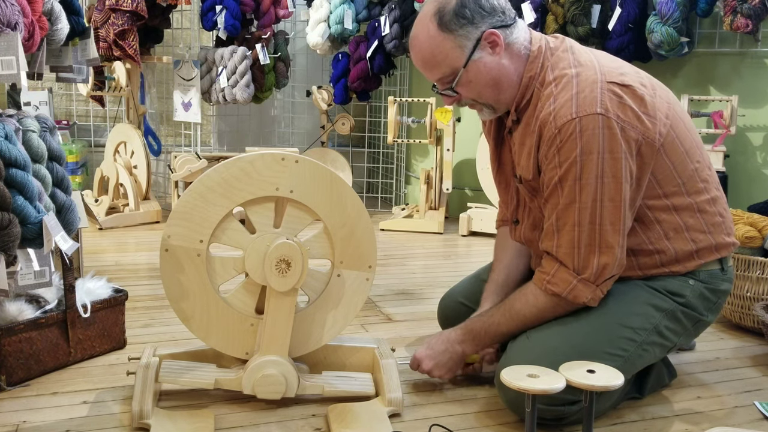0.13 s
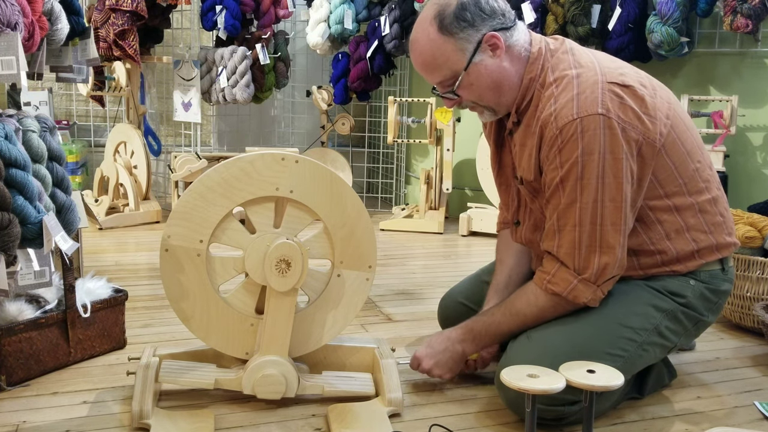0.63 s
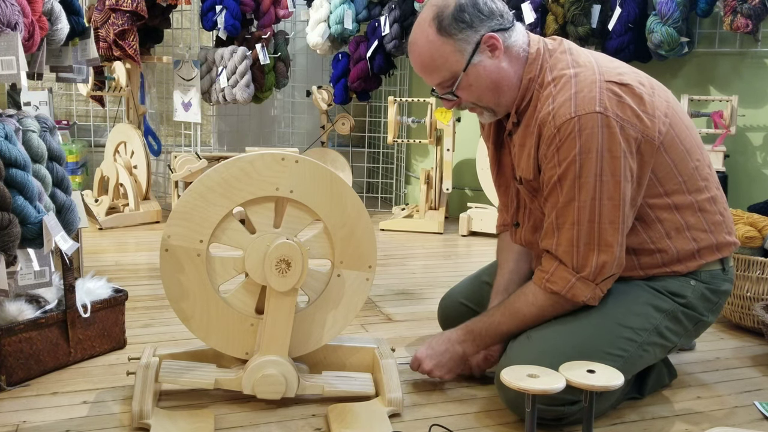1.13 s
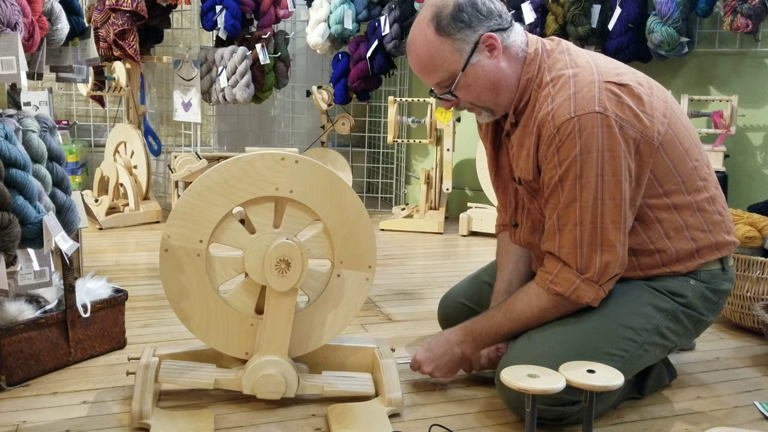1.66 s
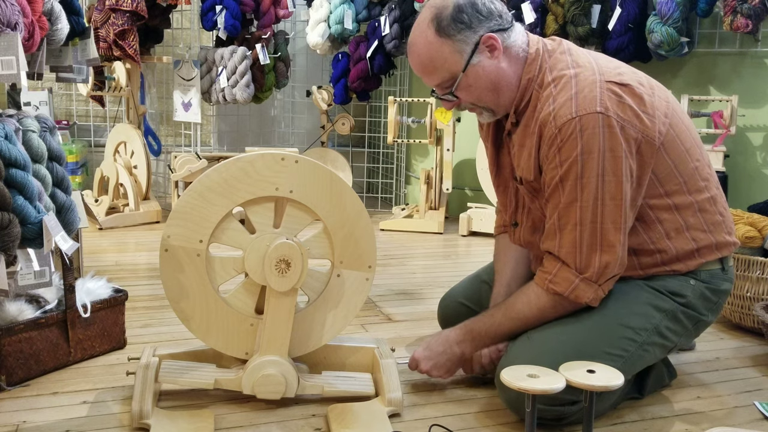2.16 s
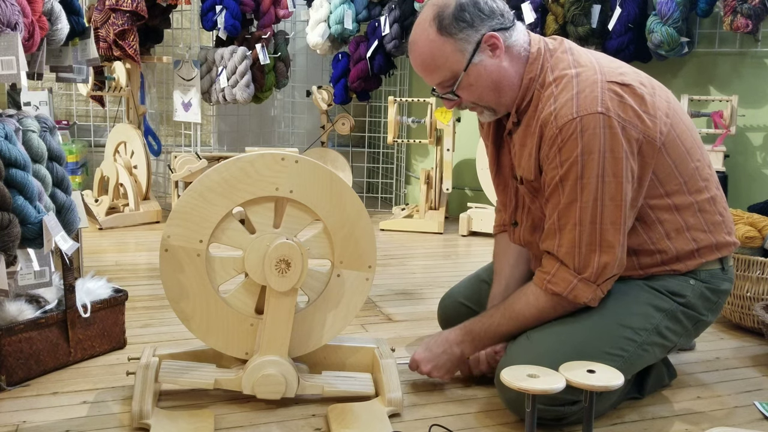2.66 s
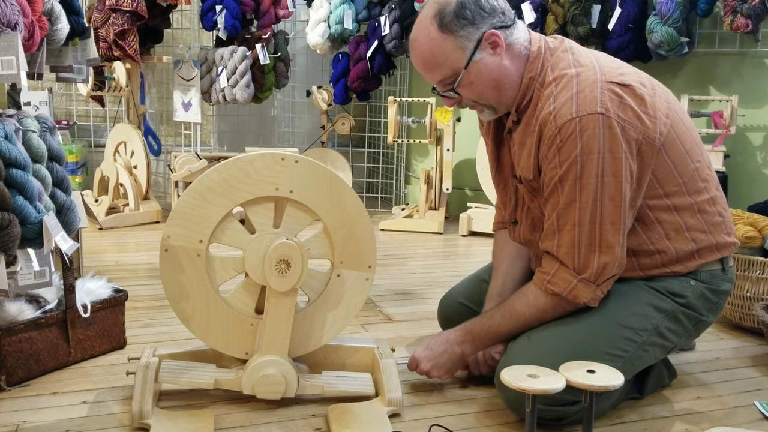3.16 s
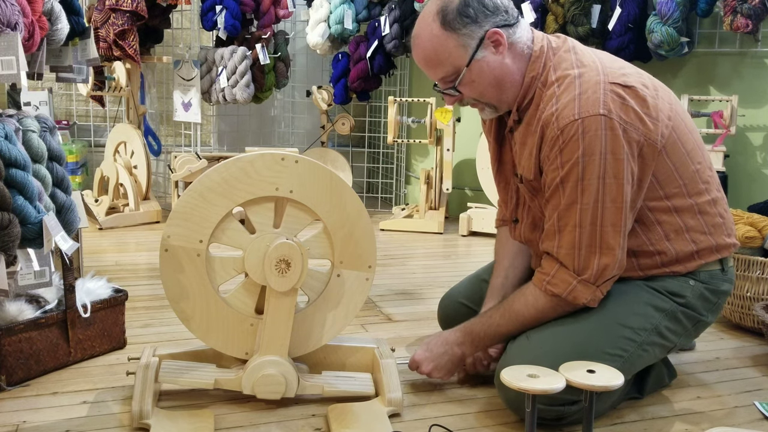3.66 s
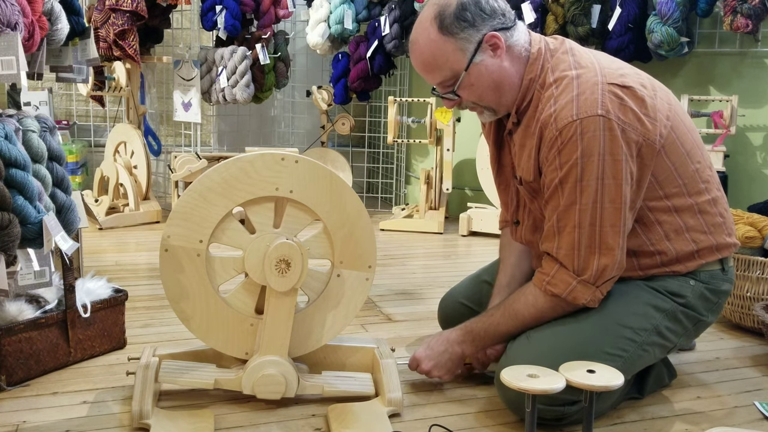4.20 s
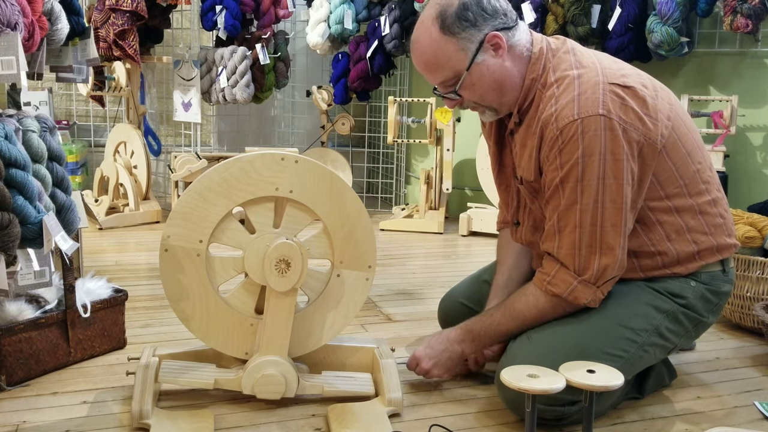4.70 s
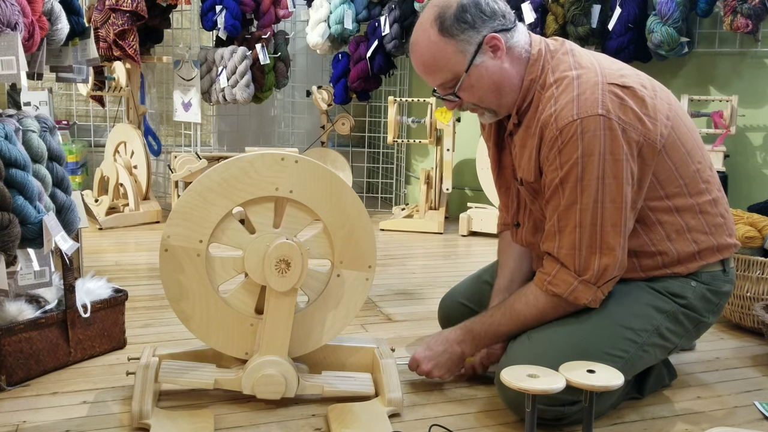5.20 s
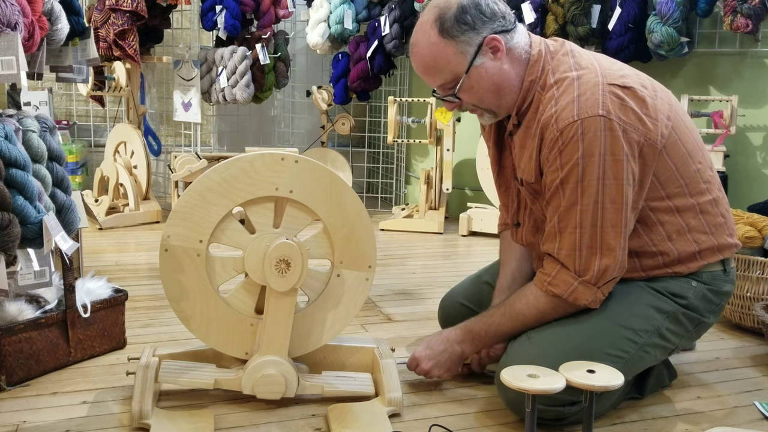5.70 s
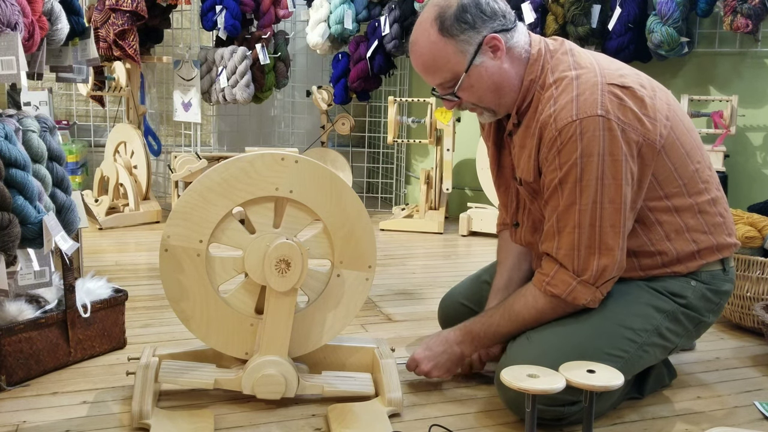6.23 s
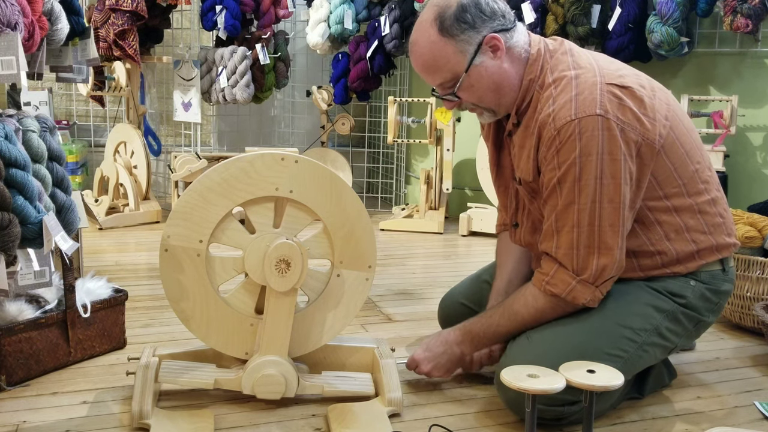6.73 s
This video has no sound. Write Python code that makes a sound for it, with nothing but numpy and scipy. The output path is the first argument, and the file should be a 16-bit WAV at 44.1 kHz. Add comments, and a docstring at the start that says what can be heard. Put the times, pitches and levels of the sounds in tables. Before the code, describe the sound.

A hand screwdriver slips and knocks irregularly on a wooden frame over a plank floor, above low street rumble that grows as vehicles pass.

```python
"""A shop with a plank floor: a hand screwdriver turns screws into a wooden frame. Its tip slips and knocks or
scrapes, the frame bumps the floor and the screw head pings; struck parts ring in modes. Shifting weight drums
the floor, a decaying low tone. Street rumble, shaped noise, makes the shop boom on two low notes, later with a
weaker upper one: narrow-band noise, drawn as wavering sines whose levels rise and fall. Two vehicles pass as
roar and tyre noise. The left microphone port hisses in the upper middle range."""
import sys
import numpy as np
from scipy import signal
from scipy.fft import rfft, irfft, next_fast_len
from scipy.io import wavfile
from scipy.ndimage import uniform_filter1d

SR = 44100
rng = np.random.default_rng(int(sys.argv[2]) if len(sys.argv) > 2 else 0)


def ratio_of_db(decibels):
    """Turn decibels (scalar or array-like) into linear amplitude factors; 0 dB maps to 1."""
    return 10 ** (np.asarray(decibels, float) / 20)


def transcribe(u):
    """Save the signal u as a 16-bit wav file named by the first command-line argument.

    u: samples, shape (n,) or (channels, n), limited to [-1, 1]; the rate is SR.
    q: integer samples, one column per channel.
    """
    v = np.clip(np.atleast_2d(u).T, -1, 1)
    q = np.round(v * 32767).astype(np.int16)
    wavfile.write(sys.argv[1], SR, q)


N = 302069  # length in samples


def read(points, hz):
    """Reads a table of (f/Hz, value) over log frequency."""
    f, value = np.transpose(points)
    return np.interp(np.log(hz + 1), np.log(f + 1), value)


def curve(rows):
    """Reads a table of (t/s, value) for every sample."""
    t, value = np.transpose(rows)
    return np.interp(np.arange(N) / SR, t, value)


def noise(colour, patchy_db, lean, likeness, notes=()):
    """Two-port noise of mid rms 1 with drifting patches and a slow swell; notes are narrow resonances."""
    hz = np.fft.rfftfreq(2048, 1 / SR)
    a, b, c, d, patches = rng.standard_normal((N // 512 + 5, len(hz), 5)).T
    swell = uniform_filter1d(patches[0], size=8)
    patches = uniform_filter1d(patches, size=12, axis=0)  # over frequency
    patches = uniform_filter1d(patches, size=6, axis=1)  # over time
    drift = patches / patches.std() + 0.53 * swell / swell.std()
    shape_db = read(colour, hz)
    for f, width, db in notes:
        shape_db = shape_db + db / (1 + (2 * (hz - f) / width) ** 2)
    same = np.clip(read(likeness, hz), -1, 1)[:, None]
    left = a + 1j * b
    right = same * left + np.sqrt(1 - same ** 2) * (c + 1j * d)
    z = np.array([left, right]) * ratio_of_db(shape_db[:, None] + patchy_db * drift)
    z[1] /= ratio_of_db(read(lean, hz))[:, None]
    x = signal.istft(z, nperseg=2048, noverlap=1536)[1][:, :N]
    return x / x.mean(0).std()


# how alike street noise is at both ports: f/Hz, likeness
STREET_LIKENESS = [(60, 0.96), (200, 0.87), (400, 0.75), (700, 0.16), (1200, 0.59), (2500, 0.16),
                   (5000, 0.095)]
# notes at which the shop resonates: f/Hz, width/Hz, level/dB
SHOP_NOTES = [(182.5, 23.7, 13.5), (241.7, 5, -1), (280, 20, 6.5), (364, 35, 11), (474, 22, 7),
              (589, 55, 5.5), (1150, 150, -1)]


def street_noise(colour, patchy_db, notes=SHOP_NOTES):
    """Noise from outside, stronger at the left port, that can excite the notes of the shop."""
    lean = [(100, 0.6), (5000, 1.9)]  # left minus right: f/Hz, level/dB
    return noise(colour, patchy_db, lean, STREET_LIKENESS, notes)


# strength of the street rumble: t/s, level/dB
RUMBLE_LEVEL = [(0, -57.5), (0.65, -62), (1.1, -71.5), (1.45, -73), (1.62, -61), (2.12, -59), (2.58, -61.5),
                (3.15, -56.5), (3.85, -58.5), (4.6, -53.5), (5.11, -55.5), (5.55, -53.5), (6.85, -51.5)]
# its balance of low and high: f/Hz, level/dB
RUMBLE_COLOUR = [(25, -21), (55, 5.5), (110, -2.5), (140, -12.5), (200, -11.5), (260, -13), (400, -36),
                 (700, -54.5)]


def street_rumble():
    """Low noise from the street that rises and falls all along."""
    return ratio_of_db(curve(RUMBLE_LEVEL)) * street_noise(RUMBLE_COLOUR, 1.5)


# pitches of the lower, higher and weaker upper note, one list each, before they waver: t/s, f/Hz
BOOM_PITCHES = [
    [(0, 78.67), (1, 73.5), (2, 77), (3.3, 75.76), (4.6, 79.43), (6.3, 78.53), (6.85, 76.5)],
    [(0, 84.6), (.3, 87.5), (1.2, 86.93), (1.5, 92.16), (2.8, 90.5), (4.3, 93.6), (5.6, 92), (6.5, 93.18),
     (6.85, 90.17)],
    [(4.4, 119), (5.2, 119.2), (6.85, 117.8)],
]
# the course of levels for each note: t/s, level/dB
LOW_BOOM = [(0.0, -50), (0.44, -75), (0.48, -57.5), (1.08, -54.5), (1.24, -79), (1.62, -55), (2.78, -69.5),
            (3.49, -49), (3.83, -60.5), (4.02, -48), (4.58, -52.5), (4.64, -77), (4.69, -48), (4.92, -48),
            (5.04, -60.5), (5.32, -44), (5.74, -70), (6.28, -35), (6.81, -40), (6.85, -38)]
HIGH_BOOM = [(0.0, -52.5), (0.21, -43), (0.36, -69), (0.44, -51.5), (1.22, -60), (1.77, -43), (1.89, -52),
             (2.15, -45), (2.65, -64), (2.76, -47), (2.96, -55.5), (3.09, -42.5), (3.89, -56.5),
             (4.14, -43.5), (4.37, -64), (4.46, -50), (5.04, -50.5), (5.17, -64), (6.09, -40.5),
             (6.28, -56), (6.49, -38), (6.7, -43), (6.79, -32.5), (6.85, -40.5)]
UPPER_BOOM = [(4.2, -80), (4.6, -58), (5.0, -53), (5.3, -56.5), (5.6, -70), (6.2, -59.5), (6.6, -56),
              (6.85, -50)]


def boom():
    """Narrow-band low room noise, drawn as wavering sines whose levels rise and fall along set courses."""
    waver_hz = 0.58
    out = np.zeros(N)
    for pitch, level in zip(BOOM_PITCHES, (LOW_BOOM, HIGH_BOOM, UPPER_BOOM)):
        # about eight random pitch targets a second
        waver = np.interp(np.arange(N), np.linspace(0, N, 56), rng.standard_normal(56))
        turns = np.cumsum(curve(pitch) + waver_hz * waver) / SR + rng.random()
        out += np.sqrt(2) * ratio_of_db(curve(level)) * np.sin(2 * np.pi * turns)
    return out


# quiet shop and microphone: f/Hz, level/dB per Hz
QUIET_COLOUR = [(20, -25.5), (35, -14), (50, -4.5), (70, 3.5), (110, -9.5), (140, -10), (185, -13),
                (260, -25), (500, -28.5), (1200, -34.5), (2000, -41), (3500, -41), (6000, -48), (7600, -57),
                (8600, -56.5), (9800, -49.5), (12000, -40), (16000, -37.5)]
# extra hiss of the left port: f/Hz, level/dB per Hz
LEFT_HISS_COLOUR = [(1000, -36.5), (1500, -8.5), (1950, 3.5), (2500, -1.5), (3000, -10.5), (3600, -22),
                    (4300, -18), (5000, -15), (6500, -17), (7300, -30), (8500, -62)]
# how alike the hiss is at both ports: f/Hz, likeness
HISS_LIKENESS = [(60, 0.74), (150, 0.71), (380, 0.43), (950, -0.055), (2380, -0.51), (5980, 0.082),
                 (15000, -0.1)]
# hiss, left minus right: f/Hz, level/dB
HISS_LEAN = [(60, 2.9), (210, 4.7), (500, 0.44), (15000, 1.2)]


def quiet_and_hiss():
    """Shaped noise of the quiet shop and microphone, plus more hiss at the left port."""
    quiet_db, left_hiss_db = -59.5, -67.5
    out = ratio_of_db(quiet_db) * noise(QUIET_COLOUR, 2.2, HISS_LEAN, HISS_LIKENESS)
    out[0] += ratio_of_db(left_hiss_db) * noise(LEFT_HISS_COLOUR, .8, HISS_LEAN, HISS_LIKENESS)[0]
    return out


FRAME_PART, PLANK_PART, SHANK_PART, TIP_PART, SCREW_PART = range(5)
# modes of each part, before each contact varies them: f/Hz, level/dB, t60/s (time to fall 60 dB)
FRAME = [(599, -13, 0.069), (805, -15.5, 0.02), (904, -8, 0.028), (1142, -1, 0.054), (1232, -0.5, 0.017),
         (1410, -0.5, 0.034)]
PLANKS = [(245, -21.5, 0.02), (271.4, 9.5, 0.074), (335, 2, 0.07), (384, 1.5, 0.12), (480, 3.5, 0.095)]
SHANK = [(1742, 1, 0.025), (1925, 3.5, 0.027), (2040, 0, 0.0039), (2383, -4, 0.02), (2750, -9.5, 0.018)]
TIP = [(3270, 2, 0.0082), (3840, -1, 0.016), (4220, 2, 0.017), (4650, -5, 0.0087), (5300, -8, 0.0097),
       (6800, -20, 0.0039), (7700, -10, 0.011), (12600, -30.5, .004)]
SCREW = [(1735, -3, .04), (2545, 0, .045), (4520, -3, .022), (6300, -16, .01)]  # screw and blade in touch


def ring_of(part, plank_hz, frame_hz):
    """Decaying sines of one part; planks and frame favour modes near the given note."""
    t = np.arange(4000) / SR
    modes = (FRAME, PLANKS, SHANK, TIP, SCREW)[part]
    hz, mode_db, t60 = np.transpose(modes)[:, :, None]
    spot = rng.standard_normal((len(modes), 2))  # each contact lands a little differently
    if part == PLANK_PART:
        mode_db = mode_db - 32.5 * abs(np.log2(hz / plank_hz))  # dB per octave
    if part == FRAME_PART:
        mode_db = mode_db - 19 * abs(np.log2(hz / frame_hz))
    envelope = ratio_of_db(mode_db + 2.74 * spot[:, :1] - 60 * t / t60)
    return (envelope * np.sin(2 * np.pi * hz * (1 + 0.0051 * spot[:, 1:]) * t)).sum(0)


# echoes that drive frame, planks, shank, tip, screw, in this order: level/dB, t60/s
PART_ECHOES = [(5.5, 0.26), (-11.5, 0.73), (5.5, 0.35), (-1.5, 0.47), (4.5, 0.42)]


def contact(parts, chatter_ms, blow, plank_hz=None, frame_hz=None, press_ms=0):
    """A blow and its chatter, then scattered shop echoes, through the modes of the parts (index, dB)."""
    near_walls_ms, late_db = 59, -4  # the near walls answer first, then the echoes are weaker
    out, t = 0, np.arange(12000) / SR
    grit = rng.standard_normal((3, len(t)))
    chatter = grit[0] * abs(grit[0]) / (1 + (t * 1000 / chatter_ms) ** 6)
    chatter *= np.exp(-t * 1000 / (1.26 * chatter_ms))
    chatter[:3] += blow
    scatter = .6 * grit[0] + grit[1:]  # the ports share part of the echoes
    scatter *= ratio_of_db(late_db / (1 + (near_walls_ms / (1000 * t + 1)) ** 12))
    press = np.hanning(3 + round(press_ms * SR / 1000))  # a longer press is softer
    for part, db in parts:
        echo_db, echo_t60 = PART_ECHOES[part]
        ring = ring_of(part, plank_hz, frame_hz)
        echoes = scatter * ratio_of_db(echo_db - 60 * t / echo_t60) * np.minimum(t / 0.0028, 1)
        drive = signal.lfilter(press, 1, chatter + echoes)
        sound = signal.fftconvolve(drive, ring[None], axes=1)
        loudest = np.sqrt(uniform_filter1d(sound.mean(0) ** 2, size=500).max())  # rms over 11 ms
        out = out + ratio_of_db(db) * sound / loudest
    return out


def wood_and_steel(frame_db, plank_db, steel_db):
    """Levels for a slip of the tip: the tip rings 8 dB weaker than the shank."""
    return [(FRAME_PART, frame_db), (PLANK_PART, plank_db), (SHANK_PART, steel_db), (TIP_PART, steel_db - 8)]


def add(mix, s, sound):
    """Mixes a sound in at a time in seconds."""
    part = mix[:, round(s * SR):][:, :sound.shape[1]]
    part += sound[:, :part.shape[1]]


# the tip scrapes along the wood: t/s, frame level/dB, planks level/dB, steel level/dB, chatter length/ms
SCRAPES = [(0.112, -59, -56.5, -63.5, 59), (0.989, -66, -74, -69, 25), (2.127, -66, -65, -75, 10),
           (2.149, -66.5, -65, -70, 33), (3.28, -54, -51, -62.5, 29.2), (4.36, -62.5, -58, -64.5, 40)]


def scrapes():
    """A weak blow with chatter rings wood and steel as the tip slides."""
    out = np.zeros((2, N))
    for s, frame_db, plank_db, steel_db, ms in SCRAPES:
        parts = wood_and_steel(frame_db, plank_db, steel_db)
        add(out, s, contact(parts, ms, blow=3, plank_hz=370, frame_hz=800))
    return out


# the frame bumps the floor: t/s, planks level/dB, favoured plank note f/Hz
BUMPS = [(0.335, -68, 269), (0.406, -47.5, 320), (0.436, -52.5, 260), (0.801, -64, 266), (1.7, -56, 257),
         (1.893, -63.5, 234), (2.505, -55.5, 234), (2.572, -56, 262), (3.483, -57.5, 231)]


def bumps():
    """A soft blow that presses for 1.2 ms rings only the planks."""
    out = np.zeros((2, N))
    for s, db, hz in BUMPS:
        add(out, s, contact([(PLANK_PART, db)], chatter_ms=13, blow=9.5, plank_hz=hz, press_ms=1.2))
    return out


# weight shifts on the floor: t/s, level/dB before the slow onset, f/Hz, t60/s
THUDS = [(.41, -34.5, 51.8, 0.61), (4.479, -31.5, 49.8, 0.51)]


def thuds():
    """The whole floor drums at a low note after a soft push."""
    out, t = np.zeros(N + SR), np.arange(SR) / SR
    for s, db, hz, t60 in THUDS:
        onset = 1 - np.exp(-t / 0.02)
        out[round(s * SR):][:SR] += ratio_of_db(db - 60 * t / t60) * onset * np.sin(2 * np.pi * hz * t)
    return out[:N]


# the tip slips and knocks:
# t/s, frame level/dB, planks level/dB, steel level/dB, plank note that the spot favours f/Hz
KNOCKS = [(0.492, -64.5, -64.5, -84, 268), (0.561, -57, -48, -60, 361), (0.943, -58, -68, -86, 267.8),
          (1.224, -52.5, -52, -50.5, 302), (1.459, -70.5, -58.5, -67, 276), (2.348, -54, -51, -50, 370),
          (2.769, -56.5, -77, -90, 261), (3.085, -56, -52.5, -54, 252), (3.178, -52.5, -60, -57, 271),
          (3.918, -71, -59, -65, 258), (4.418, -46, -41.5, -48.5, 350), (4.527, -43.5, -76, -51, 242),
          (4.831, -67.5, -53.5, -62.5, 270), (5.313, -57.5, -68, -61, 348), (5.857, -38.5, -67.5, -44, 350),
          (6.048, -55, -57.5, -68, 381), (6.106, -58.5, -50, -61, 363), (6.588, -49.5, -56.5, -52, 231),
          (6.825, -41, -65.5, -54.5, 392)]


def knocks():
    """A firm blow with brief chatter rings frame, planks, shank and tip."""
    out = np.zeros((2, N))
    for s, frame_db, plank_db, steel_db, hz in KNOCKS:
        parts = wood_and_steel(frame_db, plank_db, steel_db)
        add(out, s, contact(parts, chatter_ms=13, blow=11.6, plank_hz=hz, frame_hz=1250))
    return out


# the tip strikes the screw head: t/s, level/dB
PINGS = [(1.219, -51), (3.082, -55), (4.416, -51)]


def pings():
    """A hard blow makes the steel of screw and blade ring."""
    out = np.zeros((2, N))
    for s, db in PINGS:
        add(out, s, contact([(SCREW_PART, db)], chatter_ms=9.9, blow=14))
    return out


# vehicles: closest t/s, roar level/dB, tyre hiss level/dB, time to cover the closest distance t/s
PASSES = [(5.219, -55.5, -62, 0.27), (6.35, -56.5, -65.5, 0.48)]
# balance of the roar: f/Hz, level/dB
ROAR_COLOUR = [(100, -4), (190, 8.5), (350, 1.5), (600, 6), (900, 1), (1250, 1), (1550, -11), (2200, -36)]
# balance of the tyre hiss: f/Hz, level/dB
TYRE_COLOUR = [(1400, -4), (1850, -3), (2300, -9), (2900, -1), (3500, -12), (3950, -6), (4600, -21.5),
               (6500, -19), (8000, -77.5)]


def vehicles():
    """Roar and tyre hiss come into earshot and weaken with the distance of each passing vehicle."""
    roar_fall_db, tyre_fall_db = 20.5, 30.5  # per tenfold distance
    t = np.arange(N) / SR
    fade = np.clip((t - 3.2) / 0.71, 0, 1)
    roar, tyres = np.zeros((2, N))
    for s, roar_db, tyre_db, reach_s in PASSES:
        decades = .5 * np.log10(1 + ((t - s) / reach_s) ** 2)
        roar = np.hypot(roar, ratio_of_db(roar_db - roar_fall_db * decades))
        tyres = np.hypot(tyres, ratio_of_db(tyre_db - tyre_fall_db * decades))
    passing = roar * street_noise(ROAR_COLOUR, 2.4)
    passing += tyres * street_noise(TYRE_COLOUR, 2.1, notes=())
    return fade * passing


# how far the left port runs ahead of the right: f/Hz, phase/rad
LEFT_AHEAD = [(850, 0.11), (1120, 1.87), (1400, 2.2), (1900, 0.13), (4300, 1.6), (5000, 1.43), (7000, 0.85)]
# treble response of the capsules: f/Hz, level/dB
CAPSULE = [(6000, 0), (7000, 1), (8000, -14), (9500, -10.5), (11500, 3)]


def capsules(dry):
    """Both ports share an uneven treble response, and the right port lags in phase."""
    dry = np.pad(dry, ((0, 0), (4096, 4096)), "reflect", reflect_type="odd")  # smooth ends
    size = next_fast_len(dry.shape[1])
    hz = np.fft.rfftfreq(size, 1 / SR)
    ports = np.array([np.ones(len(hz)), np.exp(-1j * read(LEFT_AHEAD, hz))])
    ports = ports * ratio_of_db(read(CAPSULE, hz))
    return irfft(rfft(dry, size) * ports, size)[:, 4096:][:, :N]


def scene():
    """Work, floor and street; work and floor are a little louder at the left port."""
    work = scrapes() + bumps() + knocks() + pings()
    low_notes = boom() + thuds()
    street = street_rumble() + vehicles()
    return work * ratio_of_db([[1.5], [-1.5]]) + low_notes * ratio_of_db([[.8], [-.9]]) + street


def band_limit(x):
    """A steep low-pass at the top of the band."""
    return signal.sosfilt(signal.butter(12, 15730, fs=SR, output="sos"), x)


def record(dry):
    """The scene through the capsules, with the quiet background and hiss added."""
    mix = capsules(dry) + quiet_and_hiss()
    return band_limit(mix)


dry = scene()
out = record(dry)
transcribe(out)
```